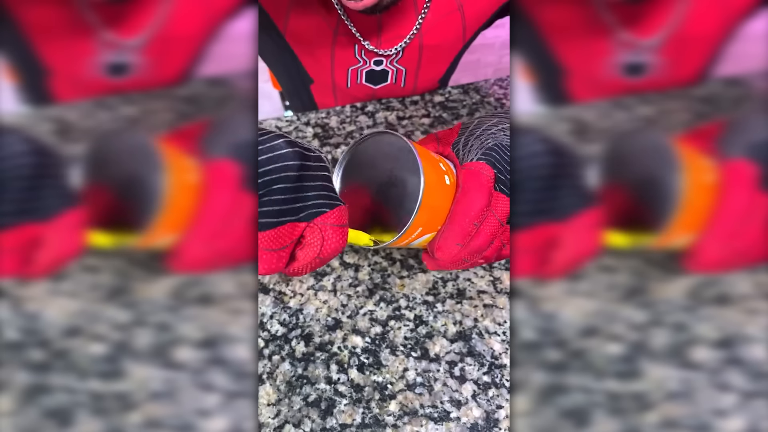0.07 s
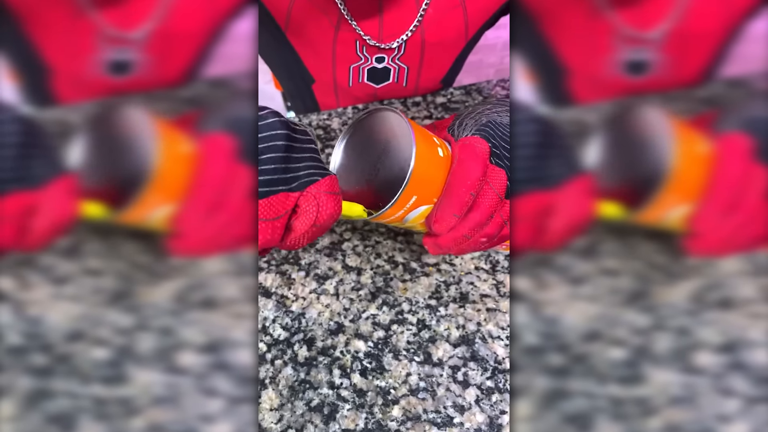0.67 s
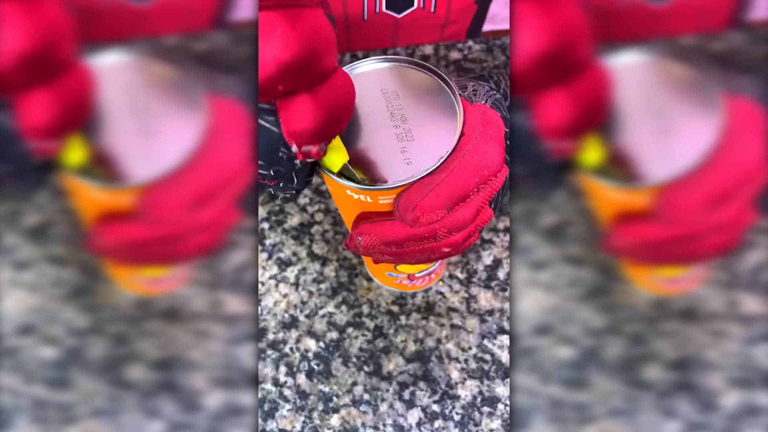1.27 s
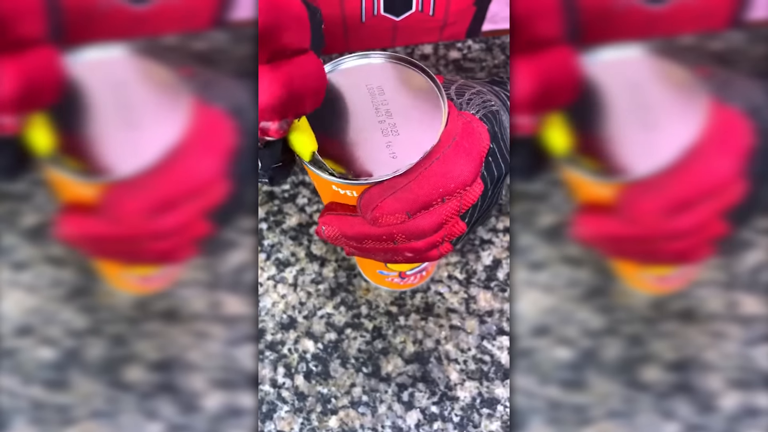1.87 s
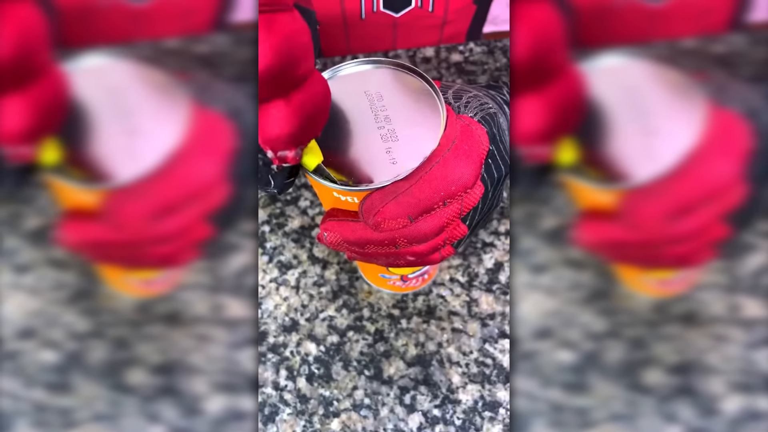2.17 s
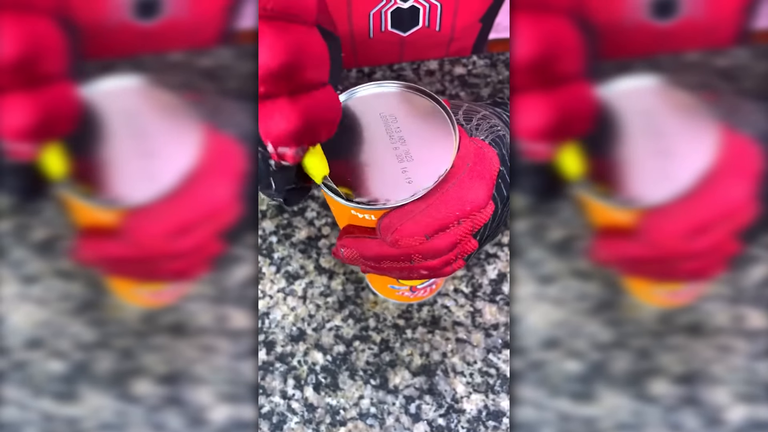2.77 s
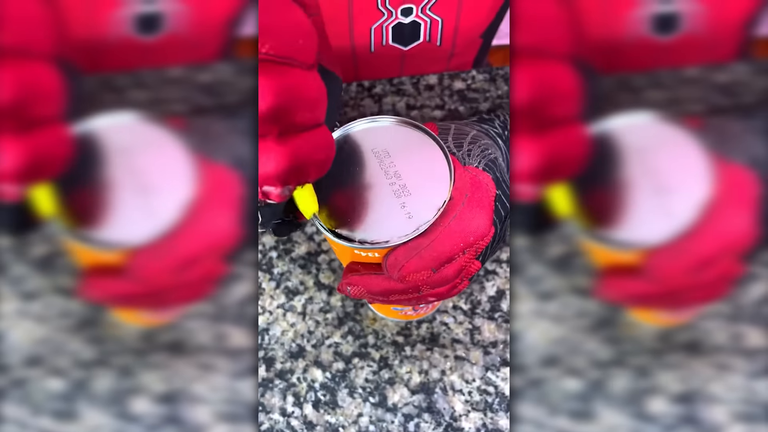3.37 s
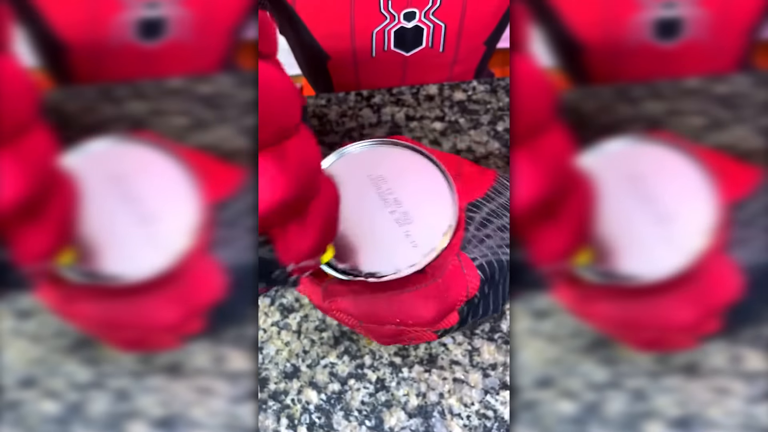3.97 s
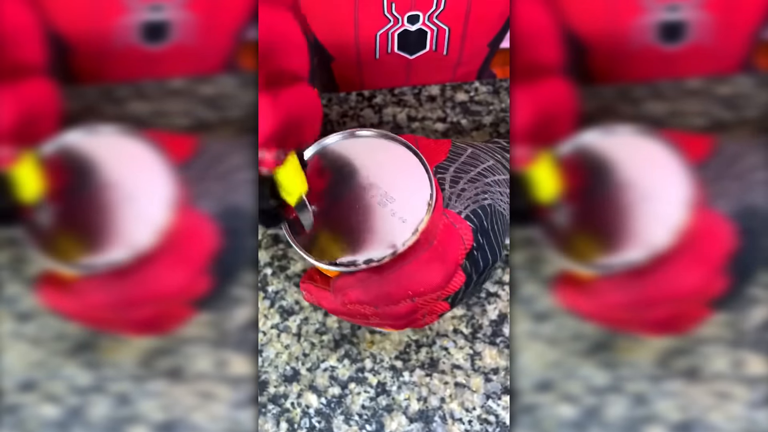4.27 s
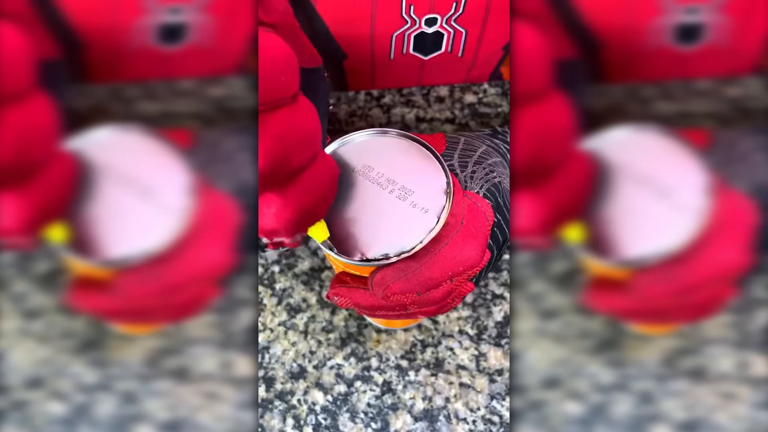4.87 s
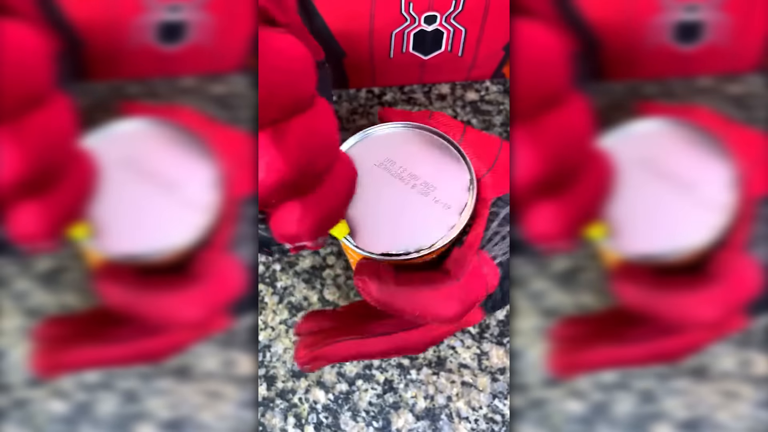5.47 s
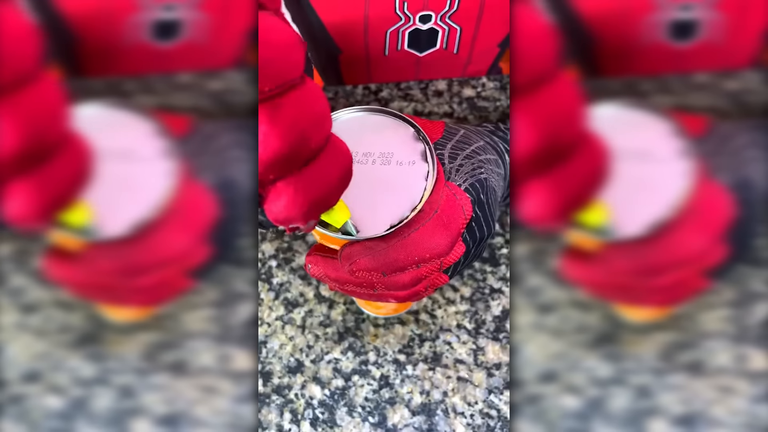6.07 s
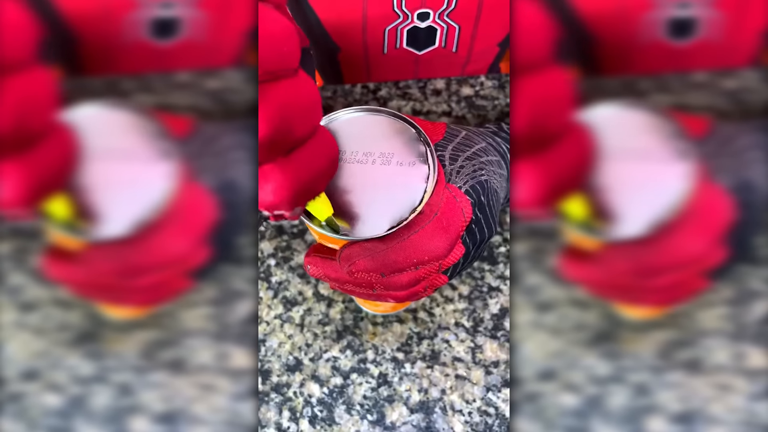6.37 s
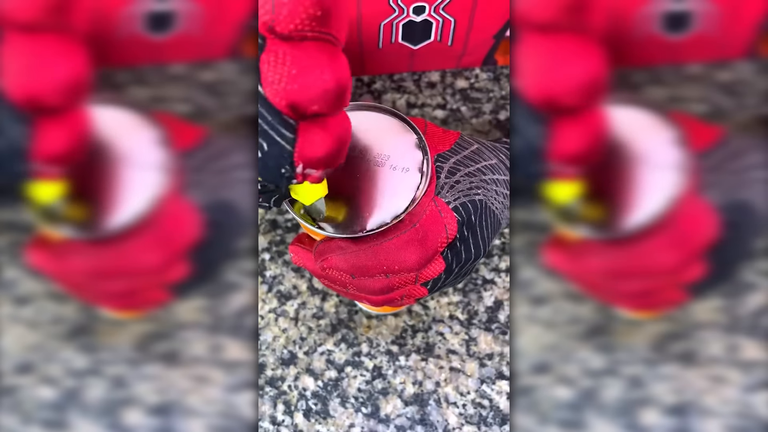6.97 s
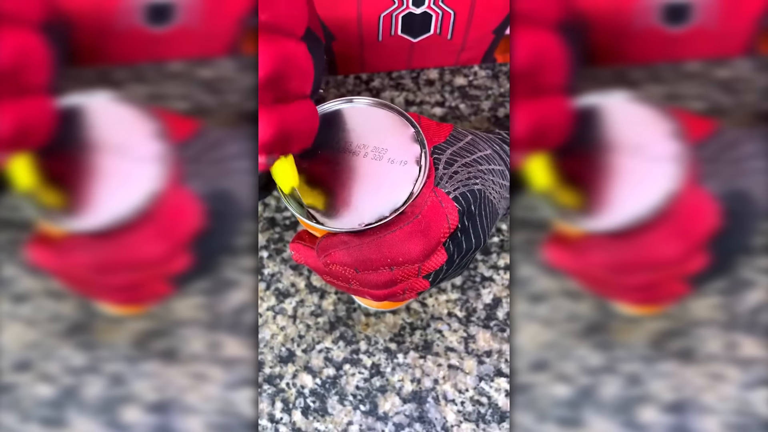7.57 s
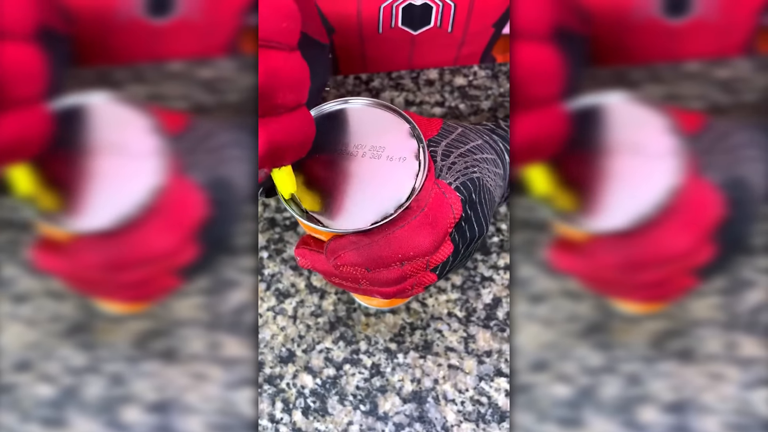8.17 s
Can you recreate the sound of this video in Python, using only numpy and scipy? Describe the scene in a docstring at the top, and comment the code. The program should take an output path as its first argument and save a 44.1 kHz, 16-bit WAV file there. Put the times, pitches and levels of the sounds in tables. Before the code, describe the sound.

Irregular metallic clicks, short scrapes and hollow knocks as a can opener cuts the metal end of a cardboard tube in a kitchen.

```python
'''A hollow thump and a short clank: a cardboard canister is set down on a stone kitchen counter.
Then a hand-held can opener works round its metal end. With each push of the key the wheel grinds,
slips and squeaks along the rim and the tube groans; the lid snaps, rasps and sings as it is cut.
The tube knocks in a gloved hand that rumbles as it shifts its hold. The kitchen reflects the
contacts, and a quiet, steady hiss lies underneath.'''
import sys
import numpy as np
from scipy import signal
from scipy.fft import rfft, irfft, next_fast_len
from scipy.io import wavfile

SR = 44100
rng = np.random.default_rng(int(sys.argv[2]) if len(sys.argv) > 2 else 0)


def dump(signal):
    """Clip the signal to [-1, 1] and save it as 16-bit WAV at the path in sys.argv[1]."""
    limited = np.clip(np.atleast_2d(signal).T, -1, 1)
    pcm = np.round(limited * 32767).astype(np.int16)
    wavfile.write(sys.argv[1], SR, pcm)


N = 362502
CUTOFF_HZ = 15800
ATTACK_S = 0.011  # wheel and blade take this long to bite


def from_db(db):
    """Decibels to gain."""
    return 10 ** (np.asarray(db) / 20)


def rms_one(x):
    """Scale to rms 1."""
    return x / np.sqrt(np.mean(x ** 2) + 1e-20)


def seconds(length):
    """A time axis."""
    return np.arange(int(length * SR)) / SR


def band(x, low_hz, high_hz, order=3):
    """Causal band-pass."""
    sos = signal.butter(order, [low_hz, min(high_hz, .45 * SR)], "band", fs=SR, output="sos")
    return signal.sosfilt(sos, x + 1e-18)


def add(track, s, sound):
    """Mix a sound in at time s."""
    start = max(0, int(s * SR))
    track[..., start:start + sound.shape[-1]] += sound[..., :N - start]


def stereo(pair, side_db):
    """Two unrelated signals, taken as mid and side, become left and right."""
    return pair[0] + from_db(side_db) * pair[1] * np.array([[1], [-1]])


def coloured(x, spectrum):
    """EQ a steady noise to a curve of (f/Hz, level/dB) points; rms 1."""
    hz, db = np.transpose(spectrum)
    size = next_fast_len(N)
    freqs = np.maximum(np.fft.rfftfreq(size, 1 / SR), 1)
    gain = from_db(np.interp(np.log(freqs), np.log(hz), db, left=-90, right=-90))
    return rms_one(irfft(rfft(x, size) * gain)[..., :N])


def resonance(x, hz, width_hz):
    """One resonance, with gain 1 at its peak."""
    r = np.exp(-np.pi * width_hz / SR)
    gain = (1 - r * r) / 2
    return signal.lfilter([gain, 0, -gain], [1, -2 * r * np.cos(2 * np.pi * hz / SR), r * r], x + 1e-18)


def burst(t, decay_s, build_s=0.0014):
    """A quick build-up and an exponential decay."""
    return np.clip(t / build_s, 0, 1) ** 2 * np.exp(-np.maximum(t - build_s, 0) / decay_s)


def canister(x, ring_db, spot_db=0):
    """A contact plus the resonances it excites; spot_db lets each spot on the rim favour its own."""
    # resonances of tube, lid and opener: f/Hz, width/Hz, level/dB
    modes = [(249.2, 20, 10), (320.4, 35.5, 9), (372.7, 7.4, 11.5), (422, 30, 3.5), (768, 17, 3),
             (912, 70, 7), (1007, 110, 5), (1417, 76, 6), (1627, 81, 2.5), (2053, 280, -2.5),
             (2656, 84, 7.5), (3178, 220, 5), (3540, 110, 5), (3910, 48, 6), (4376, 73, 0), (5153, 48, 2),
             (5740, 81, 7.5), (6300, 110, 6), (6900, 110, 4.5), (7510, 140, 2.5), (8360, 170, 2),
             (9415, 780, 10.5)]
    spots = spot_db * rng.standard_normal((x.shape[-2], len(modes), 1))
    return x + sum(from_db(db + ring_db + spots[:, k]) * resonance(x, hz, width)
                   for k, (hz, width, db) in enumerate(modes))


def snaps(grit_db=3.5, tear_s=0.0027, tear_db=-4, chatter_db=-4, seam_share=0.28):
    """Each slip is a burst of tiny fractures: the metal snaps, tears again and the tool chatters."""
    # steel snaps on the rim: t/s, level/dB, tube offset/dB, steel offset/dB, sizzle offset/dB, decay/s
    hits = [(0.001, -25.5, -6, -0.5, -9, 0.002), (0.489, -58.5, 7.5, -6.5, -40, 0.0014),
            (0.672, -57, 6.5, -2, -19, 0.0013), (0.826, -47.5, 2, -8, -30, 0.0053),
            (0.932, -47, 11.5, -6.5, -40, 0.0021), (0.984, -37, 2.5, -4, -16, 0.0048),
            (1.15, -43.5, 5, -7, -40, 0.0015), (1.2941, -27, -9, -3, -29, 0.0014),
            (1.348, -46, -12, -1, -10, 0.0013), (1.553, -51, 5.5, -9.5, -40, 0.0018),
            (1.618, -48.5, 0, -8, -42, 0.0078), (1.632, -49.5, 0, -1.5, -38, 0.0044),
            (1.697, -47.5, 8, -4, -44, 0.0017), (1.902, -55.5, 13.5, -5, -39, 0.014),
            (1.962, -66.5, -8, 5, -35, 0.0013), (2.047, -62.5, -1, -3, -43, 0.00075),
            (2.246, -41, 6.5, -10, -45, 0.0012), (2.2802, -35, 0, -12.5, -42, 0.00045),
            (2.389, -48, -2, -12, -40, 0.0006), (2.516, -42, -3.5, -0.5, 1.5, 0.0014),
            (2.5923, -50.5, 1, 3, 11.5, 0.00095), (2.842, -47, 6.5, -13.5, -40, 0.0016),
            (3.082, -21.5, -1, -3, -10, 0.0071), (3.229, -56, 23, 2.5, -7, 0.014),
            (3.342, -54.5, -2, -6.5, -32, 0.0035), (3.506, -51, 5.5, -4, -51, 0.0028),
            (3.598, -49, 7.5, -5.5, -44, 0.0034), (3.627, -24, -6.5, -10, -32, 0.0026),
            (3.651, -33, 2, -12, -40, 0.0062), (3.7987, -20, -13.5, -2, -15, 0.0035),
            (4.064, -42.5, -4, -1.5, -10, 0.0043), (4.148, -33.5, -5.5, -8, -30, 0.002),
            (4.157, -33.5, -20, 6, 7, 0.0021), (4.214, -41.5, -32, 3.5, -16, 0.0083),
            (4.324, -64.5, -12, 9.5, 0.5, 0.0036), (4.367, -62, -8, 4.5, -6, 0.0021),
            (4.443, -44.5, 7, -8, -40, 0.0041), (4.457, -38, 4, -6, -40, 0.0051),
            (4.494, -33, 5, -2.5, -27, 0.0018), (4.645, -52, 12, -15, -40, 0.014),
            (4.9157, -30, -3, -6.5, -23, 0.0018), (4.944, -34, 0.5, -7, -28, 0.011),
            (5.066, -37, 5.5, -12, -45, 0.003), (5.128, -49, -15, 8.5, 6, 0.014),
            (5.212, -30, -11.5, -3, -18, 0.0029), (5.303, -40, -2, -5, -42, 0.0012),
            (5.368, -35, -5, 4, -5, 0.0035), (5.423, -43.5, 2, -2.5, -37, 0.0095),
            (5.501, -47.5, -13, 3, -7, 0.0055), (5.591, -58, -11, 5.5, -8, 0.0063),
            (5.663, -47.5, -27, 8.5, -1, 0.0041), (5.698, -42, -16, -4, -39, 0.0015),
            (6.001, -42.5, 4, -9, -35.5, 0.0046), (6.0599, -22.5, -4, 0, -33, 0.0022),
            (6.232, -43.5, 7.5, -16, -31, 0.0015), (6.448, -50, -3.5, 1.5, -37, 0.0005),
            (6.475, -39.5, 0.5, 2.5, 5, 0.0027), (6.58, -44.5, 1, 6, -5, 0.0034),
            (6.624, -55, -14, 5.5, 4, 0.0024), (6.795, -42.5, -9.5, 1.5, -17, 0.0029),
            (6.897, -39.5, -10, -8.5, -43, 0.0097), (7.109, -52, 10, -11.5, -38, 0.00088),
            (7.362, -37.5, 1.5, -5.5, -45, 0.005), (7.628, -55.5, 15.5, -15, -37, 0.0021),
            (7.693, -46.5, -8.5, -8.5, -36, 0.004), (7.709, -48.5, 10.5, -16, -40, 0.0011),
            (7.9, -40.5, -13.5, -2.5, -6, 0.0006), (7.925, -38, -1.5, -3.5, -9, 0.007),
            (7.937, -36, 0, 7, -1, 0.0017)]
    # bands a contact shakes, from tube to cutting edge: low/Hz, high/Hz, trim/dB, side/dB
    parts = [(87, 257, -7.5, -20.5), (228, 687, 0.5, -25), (727, 1155, -6.5, -14), (1374, 2200, -6, -14.5),
             (2430, 5470, 1, -10), (5094, 8480, 1.5, -9), (12360, 13500, -6, -4)]
    starts, level, tube, steel, sizzle, decay_s = np.transpose(hits)
    seam = seam_share * tube  # where the lid joins the tube
    edge = -2.5 + 1.455 * steel  # the cutting edge brightens faster than the steel
    offsets_db = [tube, tube, seam, 0, steel, edge, sizzle]
    t, out = seconds(.15), np.zeros((2, N))
    decay_s = np.maximum(decay_s, .0005)[:, None]
    tear = from_db(tear_db) * burst(t - tear_s, decay_s)
    chatter = from_db(chatter_db) * burst(t, 0.009 + 2.3 * np.minimum(decay_s, .004))
    envelope = burst(t, decay_s) + tear + chatter
    shape = (2, len(starts), len(t))
    grit = rng.standard_normal(shape) * from_db(grit_db * rng.standard_normal(shape[1:]))
    fractures = canister(grit * envelope, ring_db=-3.0, spot_db=5)
    sounds = 0
    for (low, high, trim_db, side_db), offset_db in zip(parts, offsets_db):
        part = band(fractures, low, high)
        attack_rms = np.sqrt(np.mean(part[..., :int(.02 * SR)] ** 2, axis=-1, keepdims=True))
        mid, side = part / attack_rms * from_db(level + offset_db + trim_db)[:, None]
        side = side * from_db(side_db)
        sounds = sounds + np.stack([mid + side, mid - side], axis=1)
    for start, sound in zip(starts, sounds):
        add(out, start, sound)
    return out


def knocks(swell_s=0.0027, sag=0.072, sag_s=0.011, overtone_ratio=1.3, overtone_db=-18.5):
    """A soft blow swells and dies in a few cycles, going flat as the grip eases; the tube hums on."""
    # hollow knocks of the tube on hand and counter: t/s, level/dB, f/Hz, decay/cycles
    blows = [(0.001, -14, 432.5, 5.7), (0.002, -18.5, 590, 4.9), (0.006, -26, 100, 0.76),
             (1.252, -29, 169, 2.4), (1.419, -30.5, 546.5, 10.6), (1.476, -27, 101, 1.55),
             (1.633, -17, 518, 1.23), (1.66, -30.5, 596, 3), (1.699, -27.5, 505, 3.7),
             (2.113, -31.5, 126, 0.76), (2.247, -25, 476, 5), (2.322, -30.5, 453, 4.4),
             (2.522, -29.5, 259, 4.8), (2.721, -19.5, 159, 0.66), (2.765, -26, 84, 1.6),
             (2.957, -27.5, 233, 0.86), (3.03, -22.5, 221, 2.5), (3.046, -24, 173.4, 5.2),
             (3.087, -20, 418, 5.8), (3.628, -9, 420, 1.53), (3.65, -21, 386.6, 4.6), (3.774, -20, 116, 2),
             (4.071, -28.5, 518, 3.9), (4.155, -29, 459, 5.1), (4.499, -19, 338, 1.2),
             (4.517, -24, 121, 1.3), (4.69, -35.5, 402, 6.3), (4.924, -27.5, 277, 2.5),
             (5.069, -23, 329, 4.1), (5.079, -30, 112, 1.6), (5.424, -27, 295, 1.1),
             (6.062, -13.5, 295, 1.33), (6.8, -29.5, 481, 4.2), (6.84, -30, 442, 5.3),
             (6.902, -21.5, 350, 2.2), (6.95, -23.5, 327.5, 8.4), (6.986, -18.5, 305, 1.9),
             (7.009, -28.5, 383, 15), (7.366, -37.5, 357, 3.6), (7.541, -30, 283, 2.6),
             (7.629, -41.5, 370, 2), (7.707, -29, 323, 1.5)]
    # hum of the tube's air and walls: f/Hz, width/Hz, level/dB
    hum = [(242, 5.8, -2.5), (383.5, 4.8, 6), (434.5, 11, -11.5)]
    t, out = seconds(0.12), np.zeros(N)
    for s, db, hz, cycles in blows:
        envelope = (1 - np.exp(-(t / swell_s) ** 2)) * np.exp(-t * hz / cycles)
        pitch = hz * (1 + sag * (np.exp(-t / sag_s) - .5))
        phase = 2 * np.pi * np.cumsum(pitch) / SR
        tone = np.sin(phase) + from_db(overtone_db) * np.sin(overtone_ratio * phase)
        add(out, s, from_db(db) * envelope / envelope.max() * tone)
    return out + sum(from_db(db) * resonance(out, hz, width) for hz, width, db in hum)


def lid_rings(split=0.021, twin_db=-10.0, rattle_hz=260, rattle_db=4.0, wobble=0.14, sag_per_s=0.25):
    """The dented lid springs free and rings in close pairs of modes, rattling against the blade."""
    # clanks, pitched by the cut and the grip: t/s, f/Hz, level/dB, t60/s
    clanks = [(0.001, 1840, -10, 0.018), (0.001, 2300, -14.5, 0.02), (1.297, 2695, -26, 0.078),
              (1.297, 2370, -22, 0.035), (2.284, 3050, -24.5, 0.016), (2.518, 3130, -28, 0.022),
              (2.518, 5270, -34, 0.045), (3.082, 1039, -18, 0.11), (3.083, 2060, -23.5, 0.12),
              (3.082, 2625, -16.5, 0.048), (3.084, 3810, -17, 0.073), (3.626, 1450, -20, 0.069),
              (3.801, 909, -22, 0.27), (3.8, 1516, -14.5, 0.051), (3.802, 1634, -19, 0.06),
              (4.216, 3590, -26, 0.045), (4.494, 1386, -26, 0.089), (4.496, 1700, -27.5, 0.047),
              (4.917, 1450, -32, 0.042), (4.944, 1420, -27.5, 0.046), (5.212, 1580, -25, 0.073),
              (5.213, 3274, -22, 0.06), (5.212, 3950, -25, 0.08), (5.371, 2630, -33.5, 0.12),
              (5.37, 1970, -32.5, 0.055), (5.37, 5070, -28.5, 0.084), (5.664, 1630, -30, 0.074),
              (5.665, 3170, -35, 0.078), (6.063, 2660, -15.5, 0.068), (6.062, 810, -9.5, 0.018),
              (6.062, 1000, -12, 0.02), (6.061, 1435, -14, 0.037), (6.062, 1974, -14.5, 0.028),
              (6.475, 2610, -27, 0.053), (6.582, 2655, -29.5, 0.13), (6.58, 1670, -34, 0.05),
              (7.941, 886, -31.5, 0.14), (7.939, 3610, -23, 0.025), (7.938, 4530, -29, 0.036)]
    t, out = seconds(.35), np.zeros((2, N))
    attack = 1 - np.exp(-t / 0.00076)
    for s, hz, db, t60 in clanks:
        shake, bend = (np.interp(t * rattle_hz, np.arange(128), row)
                       for row in rng.standard_normal((2, 128)))
        pitch = hz * (1 - sag_per_s * (t - t60 / 8))  # falls as the bent lid relaxes
        wander = wobble * np.cumsum(bend) * rattle_hz / SR
        ear_phase = 0.14 * rng.choice([-1, 1]) * np.array([[1], [-1]])
        phase = 2 * np.pi * np.cumsum(pitch) / SR + wander + ear_phase
        pair = np.sin(phase) + from_db(twin_db) * np.sin((1 + split) * phase)
        add(out, s, from_db(db - 60 * t / t60 + rattle_db * shake) * attack * pair)
    return out


def kitchen(x, side_db=-8.0, onset_s=0.0047):
    """Reflections from counter and walls: a short noise tail in each band."""
    # reverb bands: low/Hz, high/Hz, t60/s, level/dB
    tails = [(59.2, 212, 0.55, -32), (271, 750, 0.5, -23.5), (744, 2130, 0.42, -21.5),
             (2340, 7060, 0.28, -17.5), (6460, 10400, 0.47, -25.5)]
    t, response = seconds(0.57), 0
    onset = 1 - np.exp(-(t / onset_s) ** 2)
    for low, high, t60, db in tails:
        tail = band(rng.standard_normal((2, len(t))), low, high) * from_db(-60 * t / t60) * onset
        response = response + from_db(db) * tail / np.sqrt(np.sum(tail ** 2, axis=1, keepdims=True))
    return signal.fftconvolve(x.mean(axis=0)[None], stereo(response, side_db), axes=1)[:, :N]


def glove(groan, rest_db=-10.5, push_db=-16, side_db=-22.0, widening=0.9):
    """The glove rumbles as it shifts its hold on the tube and presses harder with each push."""
    # weight of the shifting hold: t/s, level/dB
    grip = [(0.05, -50), (0.59, -46), (1.32, -39), (1.43, -37.5), (2.02, -39.5), (2.7, -44.5), (2.93, -31),
            (3.5, -37), (3.77, -39), (4.23, -41.5), (4.43, -45), (6.04, -45.5), (6.18, -48), (6.52, -46),
            (6.97, -37.5), (7.27, -45), (7.68, -47), (8.2, -47)]
    # spectrum of the rumble: f/Hz, level/dB
    rumble_eq = [(15, -53.5), (25, -14.5), (65, 3), (81, 8), (260, 1.5), (340, -38), (570, -120)]
    times, levels = np.transpose(grip)
    grip_db = np.interp(np.arange(N) / SR, times, levels)
    hold = from_db(rest_db + grip_db) + from_db(push_db) * groan
    width_db = side_db + widening * (grip_db - levels.mean())  # a heavier rub sounds wider
    return hold * stereo(coloured(rng.standard_normal((2, N)), rumble_eq), width_db)


def background_hiss(level_db=-59.5, side_db=-5.5, wide_above_hz=320):
    """Quiet, steady background hiss, with its bass mixed to the centre."""
    # spectrum of the hiss: f/Hz, level/dB
    hiss_eq = [(15, -31.5), (25, 2), (80, -15), (138, -13.5), (397, 7.5), (555, -3), (1240, -8.5),
               (2610, -12), (8800, -23), (9760, -30.5), (12000, -75.5), (22000, -120)]
    mid, side = coloured(rng.standard_normal((2, N)), hiss_eq)
    return from_db(level_db) * stereo([mid, band(side, wide_above_hz, CUTOFF_HZ, order=2)], side_db)


def key_pushes(ease_db=0.5, release_s=0.017, judder_hz=34.6, judder_db=3):
    """Grind and groan envelopes: each push bites, eases and lets go; the wheel catches unevenly."""
    # pushes that drag the wheel along the rim: t/s, length/s, grind/dB, groan/dB
    pushes = [(0.192, 0.15, -58, -51), (0.817, 0.038, -50, -41), (1.045, 0.27, -56.5, -55),
              (1.242, 0.18, -48, -45.5), (1.437, 0.041, -44.5, -35.5), (1.493, 0.4, -64.5, -54.5),
              (2.26, 0.1, -46, -42.5), (2.411, 0.015, -45.5, -40), (2.48, 0.061, -53, -49.5),
              (2.715, 0.088, -49.5, -41), (2.944, 0.056, -54.5, -47), (3.019, 0.11, -45, -38.5),
              (3.136, 0.19, -57, -53.5), (3.614, 0.044, -39.5, -27), (3.833, 0.22, -52.5, -45.5),
              (4.072, 0.075, -50, -42.5), (4.415, 0.048, -57, -47), (4.53, 0.34, -63.5, -54.5),
              (4.669, 0.026, -41, -39), (4.903, 0.27, -49.5, -43), (5.384, 0.28, -52.5, -51),
              (5.689, 0.091, -63, -47.5), (6.13, 0.083, -53, -45), (6.256, 0.054, -44.5, -42),
              (6.571, 0.031, -45.5, -67), (6.788, 0.055, -49, -37), (6.937, 0.069, -45.5, -43.5),
              (7.143, 0.027, -41.5, -36), (7.349, 0.036, -44, -34), (7.491, 0.064, -47.5, -39),
              (7.689, 0.016, -44.5, -33.5), (8.079, 0.037, -61, -45), (8.178, 0.029, -54.5, -49.5)]
    t, out = seconds(.6), np.zeros((2, N))
    for s, length, grind_db, groan_db in pushes:
        held = np.minimum(t / ATTACK_S, 1) * from_db(ease_db * (1 - np.minimum(t / length, 1)))
        release = np.exp(-np.maximum(t - length, 0) / release_s)
        add(out, s, from_db([[grind_db], [groan_db]]) * held * release)
    catches = np.interp(np.arange(N) / SR * judder_hz, np.arange(N), rng.standard_normal(N))
    return out * from_db(judder_db * catches)


def friction(per_s, spread_db, smooth_db):
    """Stick and slip: random grains of uneven size over a smooth rub, as two unrelated signals."""
    slips = rng.random(N) < per_s / SR
    sizes = from_db(spread_db * np.minimum(rng.exponential(1, N), 4))
    grains = rms_one(slips * sizes * rng.standard_normal((2, N)))
    return grains + from_db(smooth_db) * rng.standard_normal((2, N))


def tube_moan(slips, width_hz=75):
    """Friction drives a resonance of the squeezed tube, which shifts with the grip."""
    # glide of the resonance: t/s, f/Hz
    glide = [(0, 470), (1.1, 473), (1.7, 523), (2.3, 440), (3.1, 336), (3.65, 398), (4.1, 486), (4.55, 330),
             (5.3, 319), (6.2, 367), (7.0, 368), (8.2, 343)]
    pitch = np.interp(np.arange(N) / SR, *np.transpose(glide))
    carrier = np.exp(2j * np.pi * np.cumsum(pitch) / SR)
    # shift down, low-pass, shift back: a band that follows the pitch
    lowpassed = signal.lfilter([1], [1, -np.exp(-np.pi * width_hz / SR)], slips / carrier)
    return rms_one(band(np.real(carrier * lowpassed), 207, 720, order=2))


def wheel(grind, groan, rim_db=-2.0, crunch_db=-17, crunch_db_per_s=2, hollow_db=-3.0, moan_db=-9.0):
    """The wheel grinds along the rim, the loosened lid crunches, and the hollow tube groans."""
    # EQ curve for the grinding: f/Hz, level/dB
    rim_eq = [(350, -25.5), (600, -6.5), (1260, 3.5), (1450, 9.5), (1810, 2), (3000, 0.5), (4500, 1.5),
              (9620, -10.5), (11200, -41.5), (15000, -40)]
    # spectrum of the lid's crunch: f/Hz, level/dB
    crunch_eq = [(550, -27), (800, 8.5), (1050, 4), (1300, -7), (1600, 4.5), (2700, 4), (4000, -25),
                 (9000, -59.5)]
    t = np.arange(N) / SR
    slips = friction(per_s=1800, spread_db=2.0, smooth_db=-5.0)
    rim = from_db(rim_db) * stereo(coloured(canister(slips, ring_db=-8.5), rim_eq), side_db=-4.0)
    shaken = canister(slips, ring_db=-2.5)
    looseness = from_db(crunch_db + crunch_db_per_s * t)  # the lengthening cut frees the lid
    crunch = looseness * stereo(coloured(shaken, crunch_eq), side_db=-27.5)
    hollow = from_db(hollow_db) * stereo(rms_one(band(shaken, 200, 692, order=2)), side_db=-21.5)
    return grind * (rim + crunch) + groan * (hollow + from_db(moan_db) * tube_moan(slips))


def squeaks():
    """Steel drags on the lid: stick and slip gathers round one pitch, swelling and fading."""
    # squeaking drags: t/s, length/s, f/Hz, width/Hz, level/dB
    drags = [(0.241, 0.094, 1090, 517, -50), (1.082, 0.05, 745, 447, -46), (1.337, 0.029, 4000, 300, -39),
             (4.063, 0.18, 1576, 129, -44.5), (6.268, 0.071, 2680, 130, -46.5),
             (6.79, 0.043, 2760, 170, -60), (6.953, 0.042, 1420, 149, -43.5),
             (6.957, 0.061, 2670, 130, -55), (7.142, 0.053, 896, 329, -37), (7.151, 0.047, 2670, 160, -44),
             (7.5, 0.069, 950, 301, -40)]
    t, out = seconds(.3), np.zeros(N)
    for s, length, hz, width, db in drags:
        rub = rng.standard_normal(len(t))
        tone = rms_one(resonance(resonance(rub, hz, width), hz, width))
        swell = np.sin(np.pi * np.minimum(t / length, 1))
        add(out, s, from_db(db) * tone * swell)
    return out


def rasp(release_s=0.018):
    """The blade tears steadily through the lid: very dense, bright slips."""
    # strokes of the blade through the steel: t/s, length/s, level/dB
    strokes = [(1.24, 0.056, -53), (1.303, .06, -52), (1.358, 0.05, -52.5), (1.42, 0.049, -51),
               (1.447, 0.02, -42.5), (4.115, 0.036, -43.5), (6.286, 0.02, -53)]
    # bright rasp of the blade up to about 10 kHz, plus a thin, separate high hiss: f/Hz, level/dB
    rasp_and_hiss_eq = [(900, -18), (1700, 4), (2800, 8), (4200, 6), (6000, 3), (9800, 3.5), (11200, -45),
                        (13500, 5.5), (15500, -51)]
    t, force = seconds(.2), np.zeros(N)
    for s, length, db in strokes:
        release = np.exp(-np.maximum(t - length, 0) / release_s)
        add(force, s, from_db(db) * np.minimum(t / ATTACK_S, 1) * release)
    slips = canister(friction(per_s=4000, spread_db=-0.5, smooth_db=-4.0), ring_db=-13.0)
    return force * stereo(coloured(slips, rasp_and_hiss_eq), side_db=-6.0)


def scene(lid_send_db=-4.0, tube_send_db=-2.0):
    """Close contacts, their reflections, the glove and the background hiss, leaning slightly right."""
    grind, groan = key_pushes()
    steel = snaps() + squeaks() + rasp() + wheel(grind, groan)
    lid, tube = lid_rings(), knocks()
    # the lid faces the listener and the hand muffles the tube, so both stir the room less
    room = kitchen(steel + from_db(lid_send_db) * lid + from_db(tube_send_db) * tube)
    return (steel + lid + tube + room + glove(groan) + background_hiss()) * from_db([[-.25], [.25]])


def record(dry):
    """A steep low-pass cuts the very top."""
    return signal.sosfilt(signal.ellip(10, .1, 80, CUTOFF_HZ, fs=SR, output="sos"), dry)


dry = scene()
out = record(dry)
dump(out)
```